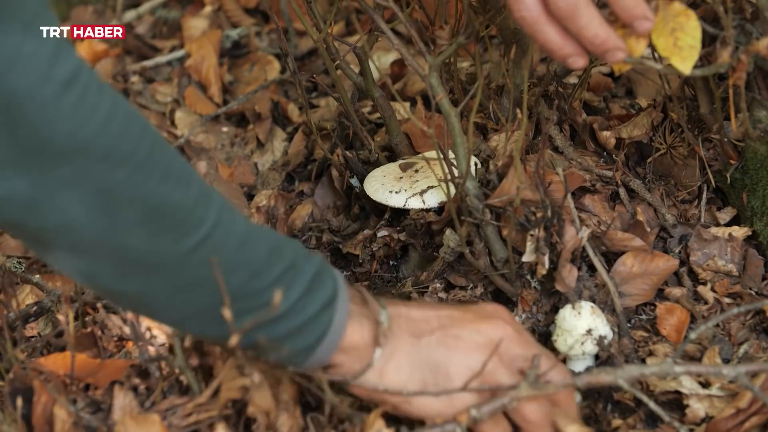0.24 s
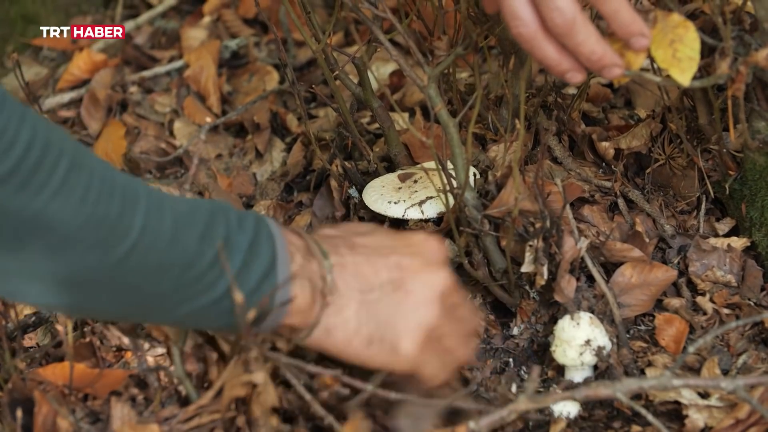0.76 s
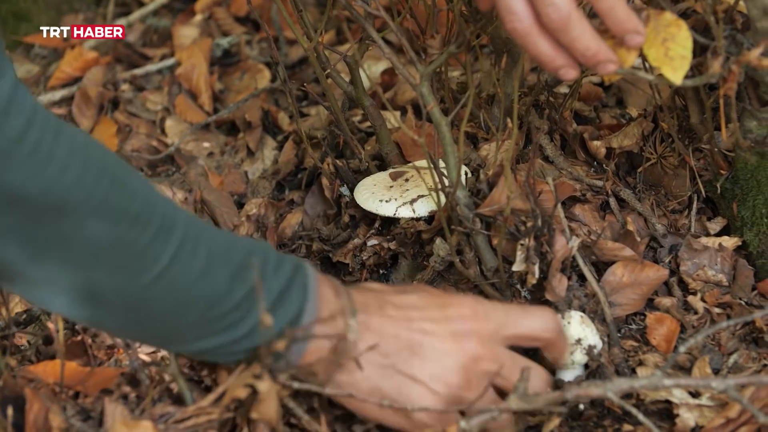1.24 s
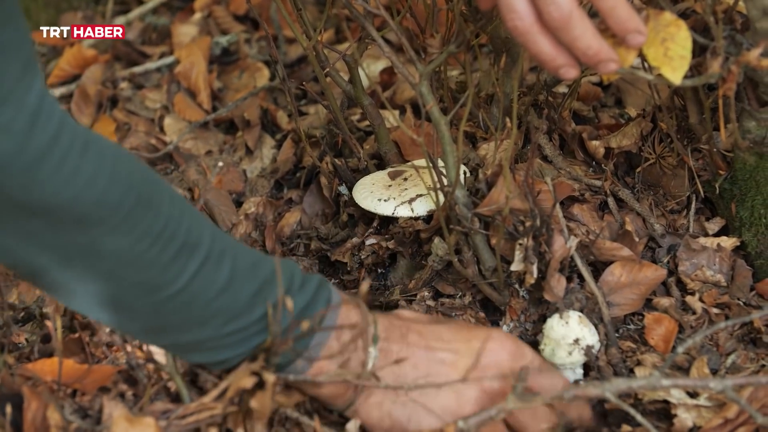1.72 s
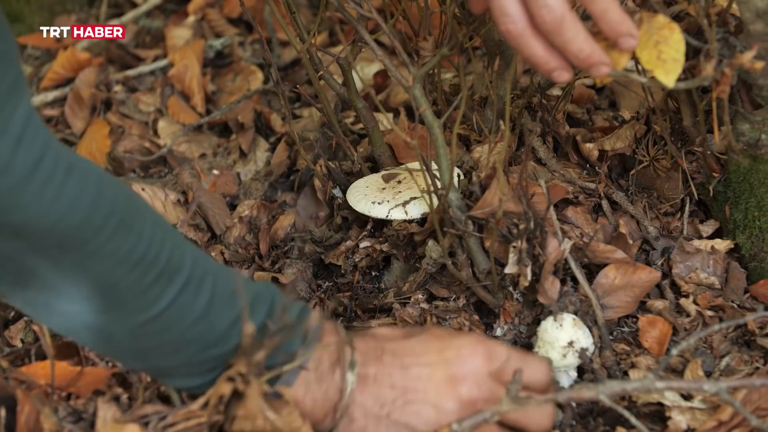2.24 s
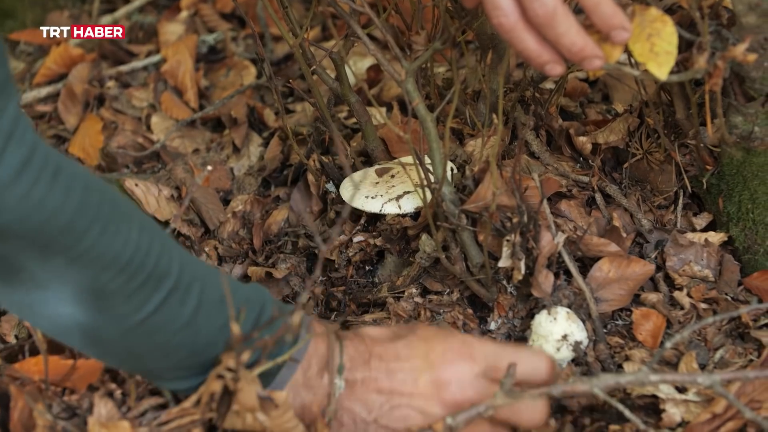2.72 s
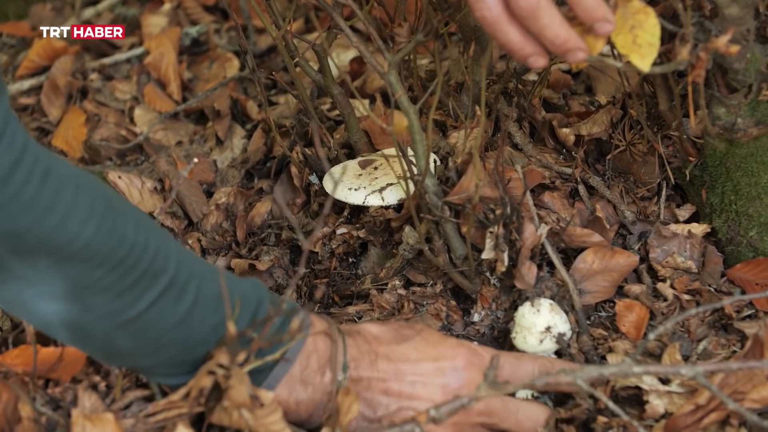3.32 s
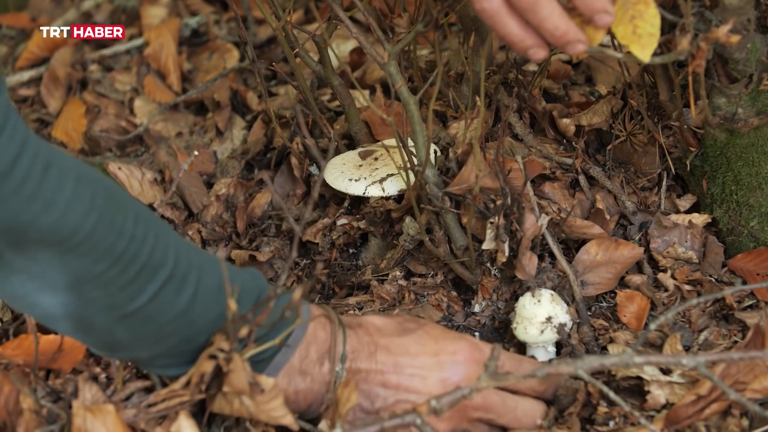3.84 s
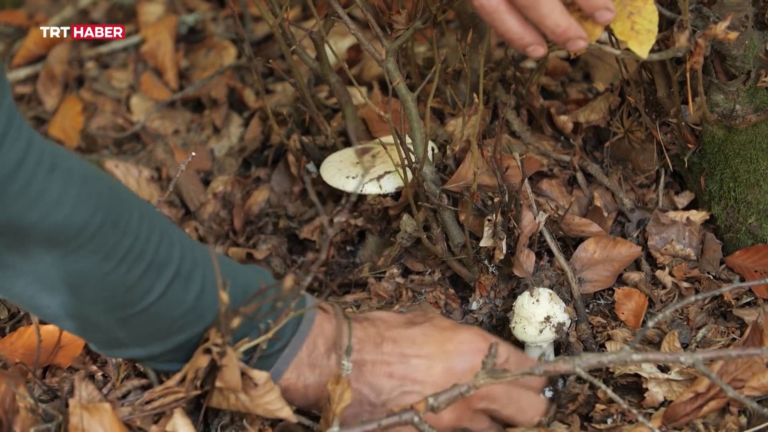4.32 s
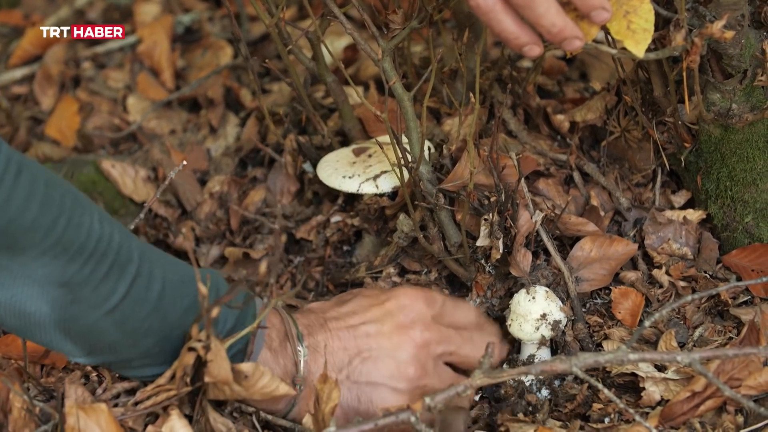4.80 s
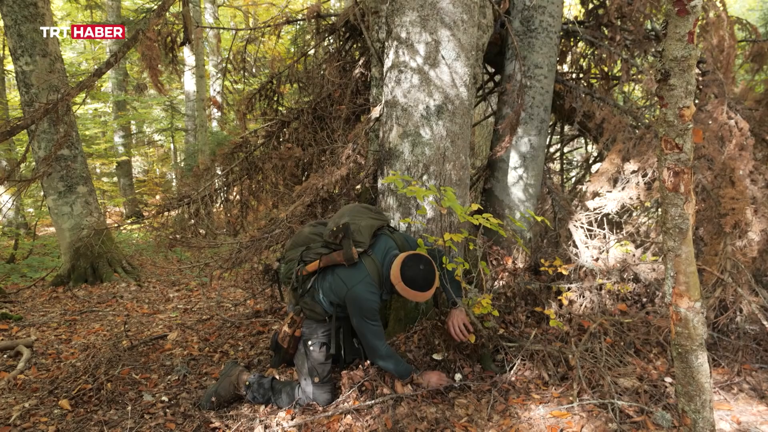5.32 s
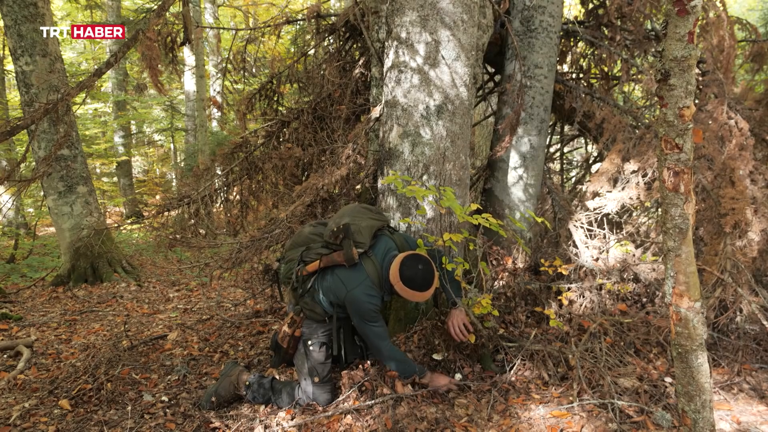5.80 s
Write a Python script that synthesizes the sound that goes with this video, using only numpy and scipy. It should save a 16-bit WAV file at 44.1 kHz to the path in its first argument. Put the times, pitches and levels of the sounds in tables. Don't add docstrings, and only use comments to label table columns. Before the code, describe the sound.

Close to the microphone, fingers rake dry leaves on a forest floor. Busy, brittle rustling and tearing come first, with a dull woody knock and light stick taps. It thins, then a tight burst of crunches peaks in one sharp stalk crack before the middle. Sparse, faint crackling follows, then firmer rustles return. A faint far rumble, breeze thuds and quiet hush lie behind.

```python
import sys
import numpy as np
from scipy import signal
from scipy.fft import rfft, irfft
from scipy.io import wavfile
from scipy.ndimage import uniform_filter1d, map_coordinates

SR = 44100
rng = np.random.default_rng(int(sys.argv[2]) if len(sys.argv) > 2 else 0)


def digitize_waveform(pressure):
    field = np.atleast_2d(pressure).T
    bounded = np.clip(field, -1, 1)
    quanta = np.round(bounded * 32767).astype(np.int16)
    wavfile.write(sys.argv[1], SR, quanta)


def gain_from_db(level_db):
    decades = np.asarray(level_db, float) / 20
    return 10 ** decades


N = 266981


def unit(x):
    return x / np.sqrt(np.mean(x ** 2) + 1e-20)


def curves(rows):
    s, *cols = np.transpose(rows)
    return [np.interp(np.arange(N) / SR, s, c) for c in cols]


def causal(points, size=2048):
    f, db = np.transpose(points)
    gain = gain_from_db(np.interp(np.log(np.fft.rfftfreq(size, 1 / SR) + 1), np.log(f + 1), db))
    cepstrum = irfft(np.log(np.maximum(gain, 1e-4)), size)
    cepstrum[1:size // 2] *= 2
    cepstrum[size // 2 + 1:] = 0
    return irfft(np.exp(rfft(cepstrum)), size)


def coloured(x, points, size=2048):
    return unit(signal.fftconvolve(x, causal(points, size=size))[:N])


def wobble(rate):
    knots = rng.standard_normal(int(N * rate / SR) + 4)
    return map_coordinates(knots, [np.arange(N) * rate / SR])


# [t/s, level/dB]
FAR_LEVEL = [(0, -51.5), (.6, -57.5), (1.2, -58), (1.6, -57), (2.1, -59), (2.42, -52), (2.75, -57.5),
             (3.02, -52.5), (3.25, -58), (3.6, -50.5), (4.1, -52), (4.64, -47), (4.95, -48), (5.4, -47.5),
             (5.65, -46), (6.05, -44.5)]
# [t/s, level/dB]
GUST_LEVEL = [(0, -52), (1, -56.5), (2.05, -56.5), (2.35, -49), (2.62, -76), (2.82, -54), (3.05, -64),
              (3.43, -63), (3.63, -51), (3.85, -64), (4.2, -60), (4.44, -53.5), (5.04, -58), (5.44, -61),
              (6.05, -57)]
# [f/Hz, level/dB per Hz]
RUMBLE_SPECTRUM = [(35, -25.5), (50, -14), (66, -3.5), (77, 1), (90, -4), (115, -13), (150, -23),
                   (220, -46), (300, -69)]
BREEZE_SPECTRUM = [(10, -10), (25, -6), (45, -8), (70, -17), (150, -62)]
HUSH_SPECTRUM = [(100, -31.5), (160, -3.5), (260, -8), (900, -14), (1200, -16.5), (1760, -18.5),
                 (6260, -18), (15500, -20.5)]


def forest():
    (rumble_db,), (breeze_db,) = curves(FAR_LEVEL), curves(GUST_LEVEL)
    noise = rng.standard_normal((3, N))
    drone = coloured(noise[0], RUMBLE_SPECTRUM, size=16384)
    chance_swell = np.abs(uniform_filter1d(drone ** 2, size=3000))
    drone = unit(drone / chance_swell ** .15)
    rumble = gain_from_db(rumble_db + 1.0 + 1.15 * wobble(4.4)) * drone
    turbulence = coloured(noise[1], BREEZE_SPECTRUM, size=16384)
    breeze = gain_from_db(breeze_db + 1.0 + 2.9 * wobble(9.1)) * turbulence
    return rumble + breeze + gain_from_db(-61) * coloured(noise[2], HUSH_SPECTRUM)


# [f/Hz, level/dB, t60/s]
BRANCH_MODES = [
    (135, -29, .11),
    (255, -35, .05),
    (330, -34, .05),
    (600, -38, .03),
    (880, -36, .03),
]
KNOCK_S = .1435


def knock():
    t = np.maximum(np.arange(N) / SR - KNOCK_S, 0)
    ring = sum(gain_from_db(db - 60 * t / t60) * np.sin(2 * np.pi * hz * t) for hz, db, t60 in BRANCH_MODES)
    return -ring * (1 - np.exp(-t / 0.0012))


# [t/s, peak level/dB rms, f/Hz]
STICK_TAPS = [(0.235, -43, 780), (0.3552, -49, 1120), (0.7638, -38, 990), (1.1065, -40, 1160),
              (1.3415, -48, 1510), (1.4472, -48, 1420), (1.5071, -47, 1290), (1.7086, -50, 1290),
              (1.9017, -54, 1380), (2.619, -56, 780), (2.8146, -48, 1160), (3.0755, -57, 950),
              (3.1314, -50, 1030), (3.516, -62, 990), (3.6098, -52, 1160), (3.9805, -57, 1340),
              (4.2364, -54, 780), (4.2444, -47, 1210), (4.38, -54, 1120), (4.9542, -46, 1160),
              (5.1638, -45, 1250), (5.3099, -53, 950), (5.8502, -48, 730), (5.9001, -50, 730)]
TAP_T60_S, TAP_RISE_S = .03, .0007


def taps():
    out, t = np.zeros(N + SR), np.arange(1500) / SR
    decay_db = -60 * t / TAP_T60_S
    for (s, db, hz), noise in zip(STICK_TAPS, rng.standard_normal((len(STICK_TAPS), len(t)))):
        rough = 1 + .6 * unit(uniform_filter1d(noise, size=30))
        ring = np.sin(2 * np.pi * hz * t) + .6 * np.sin(2 * np.pi * 2.3 * hz * t) * gain_from_db(decay_db)
        envelope = gain_from_db(db + 6 + decay_db) * (1 - np.exp(-t / TAP_RISE_S))
        out[round(s * SR):][:len(t)] += envelope * rough * ring
    return out[40:][:N]


# [t/s, crackle level/dB]
RESTING_HAND = [(0, -50), (.19, -52), (.4, -44), (.96, -45), (1.2, -52), (1.52, -51.5), (1.66, -63),
                (1.92, -52), (2.07, -54.5), (2.2, -53), (2.5, -57), (2.7, -60.5), (3.27, -67.5),
                (3.9, -64.5), (4.36, -64.5), (4.7, -54.5), (5.15, -52), (5.43, -67)]
# [t/s at full force, held/s, crackle level/dB, abruptness/dB per s]
RAKING_STROKES = [(.085, 0.016, -41.5, 90), (.245, .005, -40, 112), (.51, 0.18, -44, 150),
                  (.77, .01, -41, 120), (.857, 0.011, -42.5, 120), (1.05, .04, -41, 80),
                  (1.33, 0.022, -46.5, 53), (1.594, .005, -48.5, 200), (1.81, 0.033, -46, 110),
                  (2.3, .07, -36.5, 1500), (2.272, .02, -49, 900), (2.39, 0.022, -43, 400),
                  (2.791, 0.028, -46, 140), (2.87, 0.16, -55, 150), (3.143, .065, -48, 256),
                  (3.31, .03, -60, 150), (3.41, 0.013, -56, 90), (3.606, 0.0054, -54.5, 134),
                  (4.02, .1, -54.5, 90), (4.182, .015, -52, 250), (4.32, .02, -52, 300),
                  (4.25, .03, -56, 150), (4.48, 0.084, -46.5, 114), (4.612, .003, -38, 380),
                  (4.765, .035, -43.5, 200), (4.95, .02, -47.5, 52), (5.196, .003, -38, 240),
                  (5.28, .05, -49, 130), (5.507, 0.033, -50, 108), (5.67, .4, -46.5, 130)]
LETS_GO = 1.26


def effort():
    t = np.arange(N) / SR
    power = gain_from_db(2 * curves(RESTING_HAND)[0])
    for s, held, db, db_per_s in RAKING_STROKES:
        build = np.maximum(s - t, 0)
        release = np.maximum(t - s - held, 0)
        power = power + gain_from_db(2 * (db - db_per_s * (build + LETS_GO * release)))
    return 10 * np.log10(power)


def crackle(spread_db, life_s, cycles, pitch_spread, count=2600, size=30):
    leaf, crack = rng.random((count, 4)), rng.standard_normal((count, size, 2))
    late = -np.log(1 - rng.random((count, size)))
    start = leaf[:, :1] * N + late * life_s * SR * (.3 + 2 * leaf[:, 1:2])
    hz = np.clip(1200 * 12 ** leaf[:, 2:3] * np.exp(pitch_spread * crack[..., 0]), 300, SR * .45)
    strength = gain_from_db(spread_db * leaf[:, 3:] ** 3) * crack[..., 1] * np.sqrt(hz)
    t = np.arange(56) / SR
    ring = np.cos(2 * np.pi * hz[..., None] * t) * np.exp(-hz[..., None] * t / cycles)
    where = start.astype(int)[..., None] + np.arange(len(t))
    return unit(np.bincount(where.ravel(), (strength[..., None] * ring).ravel(), N)[:N])


# [f/Hz, level/dB per Hz]
THIN_EDGES = [(1500, -30), (3000, -10), (6000, -3), (11000, 0), (15500, -2)]


def pricks():
    lone = crackle(spread_db=8, life_s=.0006, cycles=2.5, pitch_spread=.25, count=420, size=4)
    level_db = -63 + .5 * (effort() + 50)
    return gain_from_db(level_db) * coloured(lone, THIN_EDGES)


# [f/Hz, level/dB per Hz]
OPEN_LITTER = [(1060, -43.5), (1800, -12), (1970, -12.5), (2400, -8), (3100, -6), (3390, -6), (4820, 0.5),
               (6040, -4), (8210, -4.5), (9240, -10), (11600, -8.5), (15600, -9.5)]
DUG_HOLLOW = [(1060, -47.5), (1800, -18), (2260, -13), (3210, -7.5), (3640, -5.5), (4650, -16), (5180, -6),
              (6150, -3), (7440, -13), (8290, -12), (9580, -12.5), (11000, -11), (15600, -22.5)]
LEAF_BED = [(110, -26), (165, -4), (219, -5.5), (416, 0), (455, -1.5), (709, 0), (953, -4), (1210, -1.5),
            (1900, -11), (2470, -51), (4180, -120)]
# [t/s, share heard from the hollow/0-1]
DIG_DEPTH = [(0, 0.47), (.45, .4), (.8, 0.04), (1.2, 0.18), (1.75, 0.68), (2.1, 0.48), (2.4, 1),
             (2.6, 0.68), (3.2, 0.74), (4.5, 0.7), (5.4, 0.45)]
# [t/s, extra body level/dB]
PALM_WEIGHT = [(0, 4), (.25, 2.5), (.5, 1), (.9, -1), (1.1, -2), (1.6, 1.5), (1.85, -1), (2.1, 2),
               (2.7, -2), (3.25, -2), (3.5, 1), (4.4, .5), (5.3, -1), (5.9, 2.5)]
BED_DB, BED_LAGS = -6.5, 0.17
GAP_DB, GAP_TOP_DB = 2.2, 1


def rustle():
    level_db = effort()
    body_db = BED_DB - BED_LAGS * (level_db + 50.5) + curves(PALM_WEIGHT)[0]
    deep = np.clip(curves(DIG_DEPTH)[0], 0, 1)
    slide = gain_from_db(2.25 * wobble(40)) * rng.standard_normal((2, N))
    brittle = crackle(spread_db=8, life_s=.0025, cycles=1.12, pitch_spread=.55, count=1500)
    curled = crackle(spread_db=8, life_s=.005, cycles=2.6, pitch_spread=0.11, count=1200)
    cracks = 0.64 * brittle + 0.5 * curled + 0.85 * unit(slide[0])
    cracks = cracks / np.abs(uniform_filter1d(cracks ** 2, size=2200)) ** 0.2
    bright = (1 - deep) * coloured(cracks, OPEN_LITTER) + deep * coloured(cracks, DUG_HOLLOW)
    body = coloured(unit(cracks) + 1.1 * unit(slide[1]), LEAF_BED)
    gaps = gain_from_db(np.minimum(GAP_DB * wobble(85), GAP_TOP_DB))
    return gain_from_db(level_db + 0.3) * (gaps * bright + gain_from_db(body_db - 0.43) * body)


# [t/s, peak level/dB rms, f/Hz]
LEAF_TICKS = [(.4344, -33, 4890), (.5234, -31, 6000), (1.1459, -32, 4930), (1.4008, -29, 10700),
              (1.4302, -37, 4630), (1.644, -37, 5400), (1.7092, -33, 6270), (1.7156, -30, 5270),
              (1.8131, -34, 6400), (1.8968, -40, 5900), (1.994, -37, 6460), (2.006, -33, 3720),
              (2.0293, -37, 6460), (2.1105, -34, 6030), (2.1604, -37.5, 8330), (2.3725, -23, 7600),
              (2.62, -40, 2970), (2.7166, -37, 7000), (2.9221, -39, 10100), (3.1595, -34, 3730),
              (3.2111, -31.5, 8400), (3.6278, -30.5, 6240), (4.2452, -43, 3000), (4.3273, -42, 6630),
              (4.442, -36, 5470), (4.65, -33, 5430), (4.9154, -40, 6600), (5.6963, -36, 6520),
              (5.9423, -36, 5060), (4.5018, -33, 3770),
              (1.468, -40, 6000), (1.519, -38, 5020), (1.6365, -42, 6000), (1.68, -43, 5800),
                (1.703, -40, 5800), (1.9768, -41, 9800), (2.144, -39, 5950), (2.5687, -45, 7300),
                (2.8248, -38, 6330), (2.9466, -41, 6100), (2.986, -41, 8350), (3.102, -41, 6300),
                (3.331, -42, 6300), (3.422, -41, 6930), (3.4728, -43, 6550), (3.601, -41, 5940),
                (3.6557, -38, 6420), (3.972, -41, 5800), (4.1583, -47, 5250), (4.2172, -42, 9000),
                (4.2365, -38, 7500), (4.3208, -40, 6700), (4.3399, -38, 12000), (4.437, -38, 6800),
                (4.683, -38, 6900), (4.9812, -36, 7300), (5.4311, -42.5, 5510), (5.49, -41, 6700),
                (5.753, -43, 6200), (5.9938, -36, 5900)]
# [t/s, peak level/dB rms, f/Hz]
LEAF_CRINKLES = [(0.015, -42, 6590), (0.1916, -42, 5900), (0.3238, -40, 5120), (0.3911, -41, 6760),
                 (0.4345, -35, 4820), (0.45, -39, 7020), (0.5657, -37, 4870), (0.5822, -35, 3400),
                 (1.6308, -48, 5250), (1.8453, -35, 5990), (1.8563, -41, 4090), (1.8972, -41, 5900),
                 (1.9306, -44, 6500), (1.966, -45, 3660), (2.0414, -48, 3450), (2.1017, -48, 5120),
                 (2.3058, -25, 6160), (2.4734, -51, 6200), (2.5861, -51, 5300), (2.6001, -51, 6120),
                 (2.6724, -52, 5730), (2.7073, -49, 6330), (2.8869, -46, 6500), (2.9383, -47, 5510),
                 (3.0331, -50, 5040), (3.0725, -51, 8700), (3.1114, -48, 6460), (3.1843, -43, 6120),
                 (3.2307, -45, 3750), (3.3629, -51, 5640), (3.517, -53, 5730), (3.6168, -48, 5940),
                 (3.7784, -55, 5940), (3.8233, -54, 6070), (3.9271, -53, 6330), (4.0079, -48, 8310),
                 (4.0154, -47, 6200), (4.0443, -49, 6290), (4.1585, -45, 5250), (4.2788, -49, 3270),
                 (4.2853, -49, 3400), (4.406, -35, 5510), (4.4175, -46, 5470), (4.4329, -40, 5250),
                 (4.4828, -38, 6200), (4.5866, -39, 5600), (4.6973, -45, 6980), (4.7677, -38, 5810),
                 (4.9073, -41, 5640), (5.0166, -42, 6420), (5.2141, -37, 5430), (5.2406, -43, 5560),
                 (5.3084, -40, 6030), (5.3384, -42, 4090), (5.3454, -45, 5250), (5.3778, -49, 3880),
                 (5.5479, -46, 6200), (5.6721, -43, 5600)]
# [t/s, peak level/dB rms, f/Hz]
LEAF_SCUFFS = [(0.0788, -43, 5560), (0.1332, -45, 5000), (0.2285, -42, 3790), (0.3542, -45, 3750),
               (0.4889, -39, 5430), (0.5582, -39, 4950), (0.5662, -41, 4910), (0.6994, -38, 5250),
               (0.7224, -40, 4820), (0.7368, -40, 5600), (0.7618, -35, 3230), (0.8386, -41, 5000),
               (0.865, -33, 5120), (0.89, -41, 6680), (0.9888, -41, 5120), (1.0072, -41, 5340),
               (1.0167, -39, 3140), (1.0322, -39, 6120), (1.1065, -33, 3620), (1.1459, -40, 4910),
               (1.2881, -46, 4440), (1.3419, -43, 5600), (1.3574, -44, 6030), (1.4771, -49, 4650),
               (1.7884, -45, 8480), (1.8209, -44, 3830), (2.1207, -50, 5600), (2.1416, -46, 5900),
               (2.2454, -45, 3570), (2.3402, -33, 6550), (2.3786, -30, 6160), (2.7153, -46, 5430),
               (2.7931, -37, 5940), (2.8221, -44, 6200), (2.8884, -48, 6500), (3.1254, -49, 6420),
               (3.1453, -46, 6070), (3.1952, -42, 6550), (3.9814, -53, 5730), (4.0338, -40, 5990),
               (4.1925, -48, 5560), (4.2863, -51, 5990), (4.3247, -46, 6590), (4.4309, -46, 5430),
               (4.4888, -40, 5640), (4.5856, -43, 5600), (4.598, -40, 6120), (4.9537, -46, 3060),
               (5.0166, -47, 6420), (5.1727, -40, 5300), (5.2002, -40, 3450), (5.2915, -44, 5040),
               (5.505, -46, 5340), (5.5614, -50, 6120), (5.6561, -48, 5810), (5.6731, -46, 5600),
               (5.7819, -44, 5040), (5.9011, -45, 2760), (5.9415, -44, 5000), (5.9704, -45, 7240)]


def light_breaks():
    ticks = [(s, db - 1.5, hz, -21, .2, .01) for s, db, hz in LEAF_TICKS]
    folds = [(s, db - .5, hz, -24, .9, .013) for s, db, hz in LEAF_CRINKLES]
    drags = [(s, db + 1.5, hz, -18, 2.5, .035) for s, db, hz in LEAF_SCUFFS]
    return ticks + folds + drags


# [t/s, peak level/dB rms, f/Hz, thump level/dB re peak]
TWIG_BREAKS = [(.249, -29, 3680, -16), (.2599, -22.5, 6760, -14), (.7609, -28, 3360, -4.5),
               (.9339, -23.5, 4550, -8.5), (1.0512, -25, 4100, -25), (1.3229, -27.5, 7340, -18),
               (1.507, -31, 6590, -12), (1.5487, -36, 4520, -18), (1.5757, -31, 3900, -8),
               (1.735, -40, 7200, -15), (1.7762, -36.5, 3640, -19), (1.8451, -35, 3700, -19),
               (1.8684, -33, 6200, -18), (2.2718, -31, 3720, -13), (2.2985, -32, 9000, -8),
               (2.3974, -24.5, 5580, -20), (2.418, -35, 3300, -20), (2.7791, -37, 6140, -17),
               (2.7924, -30.5, 5900, -13), (2.8293, -38, 5760, -14), (3.1384, -43, 6200, -8),
               (4.0207, -39.5, 6160, -12), (4.0338, -33, 5940, -19), (4.3985, -38, 5600, -9),
               (4.402, -37, 5600, -7), (2.3515, -27, 3600, -20), (4.406, -34.5, 5500, -11),
               (4.7774, -29, 5200, -19), (4.837, -37.5, 6000, -20), (4.9356, -36, 5170, -15),
               (5.1069, -37, 3490, -9), (5.5277, -42, 3040, -17)]
# [t/s, peak level/dB rms, f/Hz, thump level/dB re peak]
LEAF_TEARS = [(.022, -36, 7660, -12), (.0429, -31, 7140, -13), (.1168, -35, 4500, -17),
              (.2931, -39, 7390, -8), (.4897, -34, 5400, -15), (.5022, -28, 5350, -13),
              (.5821, -36, 3400, -15), (.8672, -26.5, 4700, -6), (1.066, -26.5, 6230, -14),
              (1.1069, -26.5, 7060, -8), (1.1176, -28.5, 3830, -10.5), (1.5872, -30.5, 7000, -9),
              (1.9178, -37.5, 6700, -19), (1.9604, -38, 5990, -25), (2.377, -28, 6200, -20),
              (3.226, -40, 3750, -14), (2.2766, -30, 5800, -22), (2.3497, -23, 6240, -22),
              (2.3813, -25.5, 6330, -14), (2.7876, -33, 6220, -11), (3.5863, -38.5, 6540, -24),
              (4.1798, -38, 5800, -10), (4.4685, -35, 5960, -17), (4.4895, -34.5, 5580, -22),
              (4.5397, -30, 5260, -11), (4.6085, -26.5, 6070, -20), (4.6214, -27.5, 5670, -15),
              (5.1719, -40, 5430, 0), (.2615, -27, 3300, -14), (2.3205, -29, 3500, -18),
              (4.5405, -34, 3200, -14)]
# [t/s, peak level/dB rms, f/Hz, thump level/dB re peak]
LAYER_RIPS = [
    (.5108, -33, 5600, -16),
    (.5594, -36, 4910, -15),
    (.6225, -26, 5360, -19),
    (1.939, -40.5, 7880, -15),
    (2.2444, -41, 3680, -8),
    (2.3061, -26, 6180, -17),
    (3.1955, -38, 6470, -18),
    (4.5526, -32.5, 6540, -13),
    (4.5995, -42, 6010, -5),
    (5.2156, -42, 5430, -7),
]
# [t/s, peak level/dB rms, f/Hz, thump level/dB re peak, rise/ms, t60/s]
THICK_STALK = (2.4314, -15.5, 5960, -23, .3, .003)
RING_S, HEAVY_RINGS = 0.016, 0.7


def heavy_breaks():
    events = [THICK_STALK]
    for rows, rise_ms in ((TWIG_BREAKS, .4), (LEAF_TEARS, 1.6), (LAYER_RIPS, 4.5)):
        for s, db, hz, thump_db in rows:
            t60 = RING_S * gain_from_db(HEAVY_RINGS * (thump_db + 14.5))
            events.append((s, db, hz, thump_db, rise_ms, t60))
    return events


def leaf_resonance(f, hz):
    direct = 0.58 / (1 + 1j * f / 14000)
    main = 1j * f * 1300 / (hz * hz - f * f + 1j * f * 1300)
    lower = 1j * f * 900 / ((.58 * hz) ** 2 - f * f + 1j * f * 900)
    return direct + main - .5 * lower


def snaps():
    size, lead = 4096, 512
    out, t = np.zeros(N + SR), (np.arange(size // 2) - lead) / SR
    paths = rfft([causal(OPEN_LITTER), causal(DUG_HOLLOW)], size)
    bed = rfft(causal(LEAF_BED), size)
    f, after = np.fft.rfftfreq(size, 1 / SR), np.maximum(t, 0)
    events = heavy_breaks() + light_breaks()
    for (s, db, hz, body_db, rise_ms, t60), noise in zip(events, rng.standard_normal((len(events), len(t)))):
        early = -np.minimum(t, 0) * 1000 / max(rise_ms, .1)
        begun = early < 1.1
        tear = gain_from_db(-7 * early) * begun
        rattle = gain_from_db(-60 * after / max(t60, .003)) + 0.23 * gain_from_db(-60 * after / 0.042)
        burst = rfft(noise * tear * rattle, size)
        sudden = 1.7 / (1 + rise_ms / .5)
        click = rfft(np.sign(noise) * sudden * gain_from_db(-60 * abs(t) / 0.0034) * begun, size)
        leaf = leaf_resonance(f, hz)
        click_edge = 0.08 * noise[0] * f / 9000
        share = np.clip(np.interp(s, *np.transpose(DIG_DEPTH)), 0, 1)
        path = [1 - share, share] @ paths
        bright = irfft((burst * leaf + click * (leaf + click_edge)) * path)
        body = irfft((burst + click) * bed)
        top = np.sqrt(uniform_filter1d(bright ** 2, size=66).max())
        sound = bright / top + gain_from_db(body_db + 3.5) * body / abs(body).max()
        out[round(s * SR):][:size] += gain_from_db(db - 2.0) * sound
    return out[lead + 6:][:N]


def scene():
    return (forest() + knock() + taps() + pricks() + rustle() + snaps())[None]


def band_limit(x):
    return signal.sosfilt(signal.butter(12, 16850, fs=SR, output="sos"), x)


def record(dry):
    slow = signal.butter(1, [22, 70], "band", fs=SR, output="sos")
    push = gain_from_db(20.5) * signal.sosfilt(slow, uniform_filter1d(dry ** 2, size=150))
    top_hz = 15800
    spectrum = rfft(dry + push) * (np.fft.rfftfreq(N, 1 / SR) < top_hz)
    return band_limit(irfft(spectrum, N))


dry = scene()
out = record(dry)
digitize_waveform(out)
```